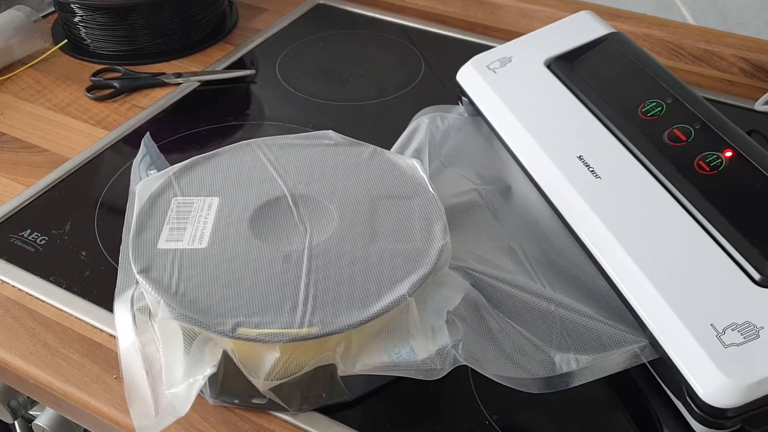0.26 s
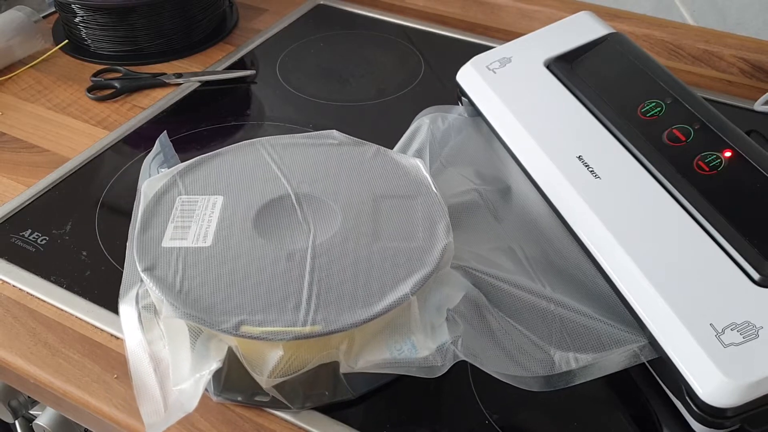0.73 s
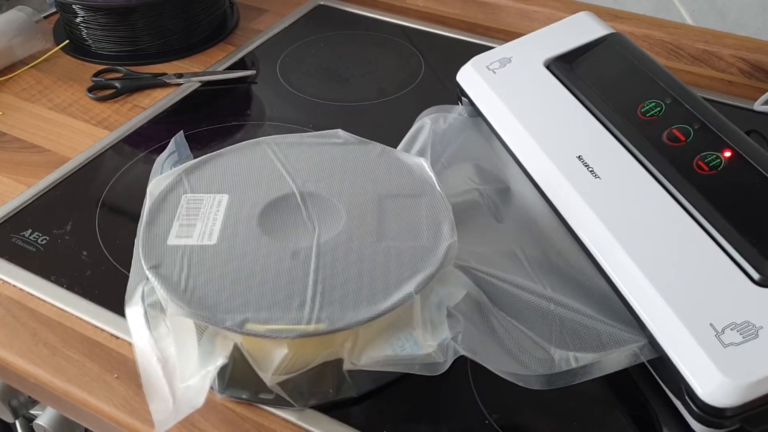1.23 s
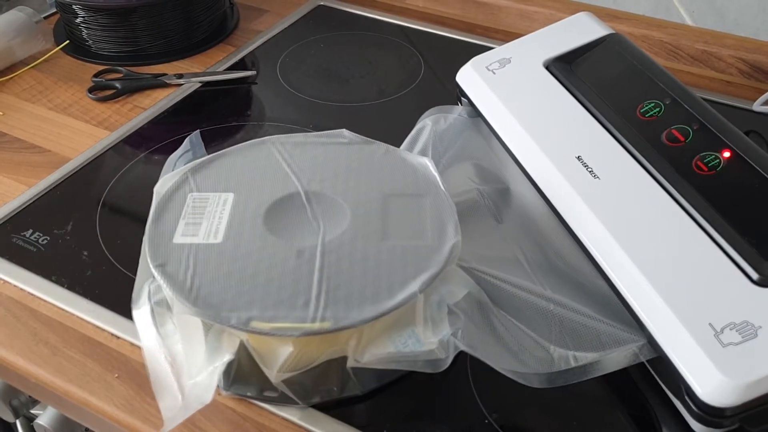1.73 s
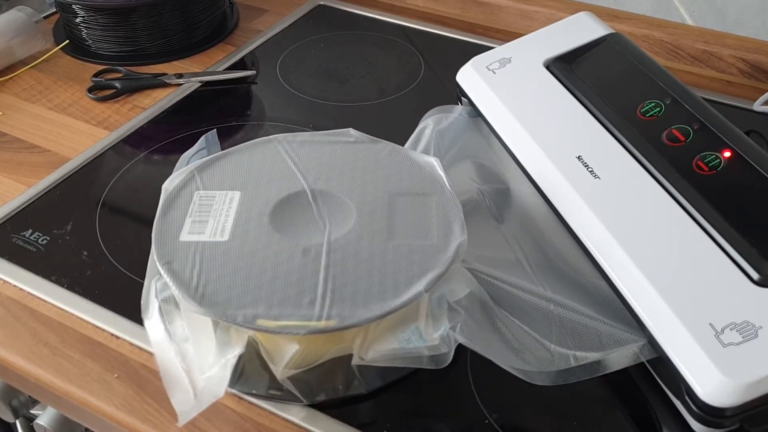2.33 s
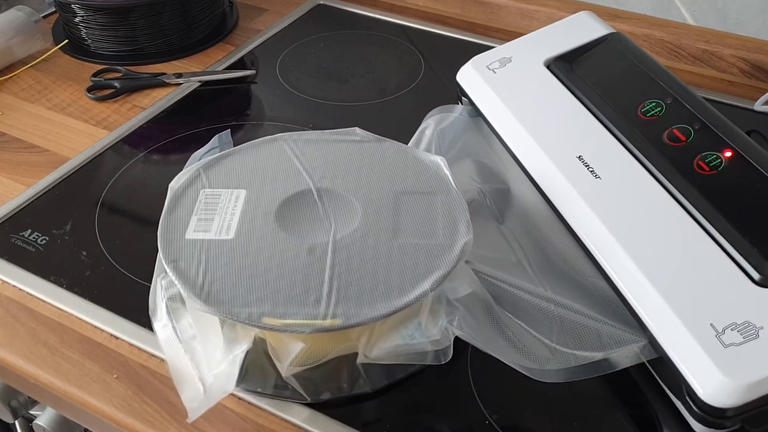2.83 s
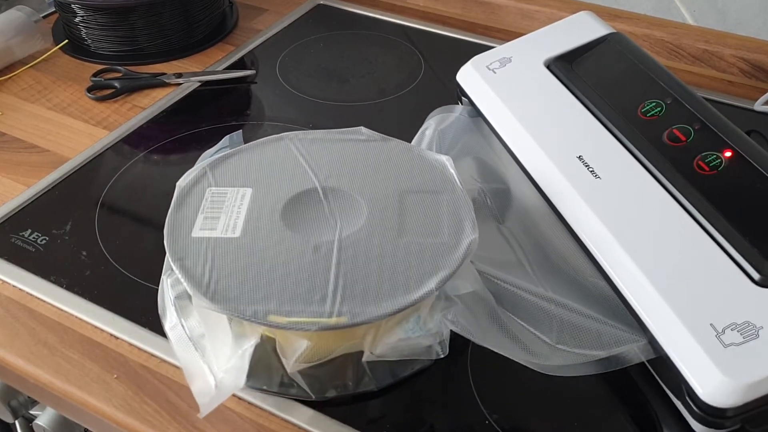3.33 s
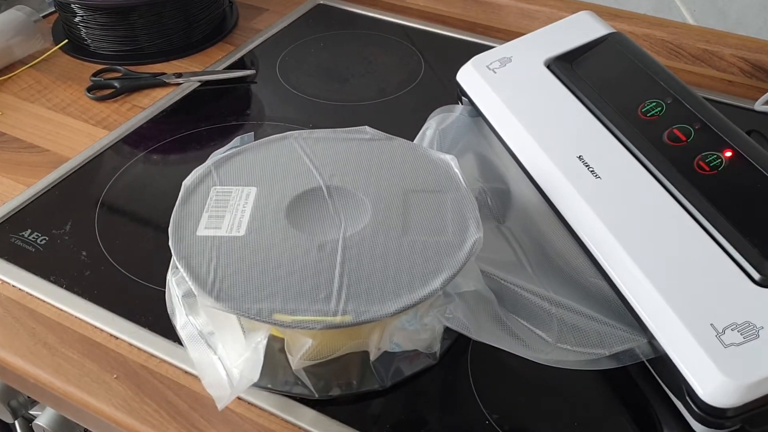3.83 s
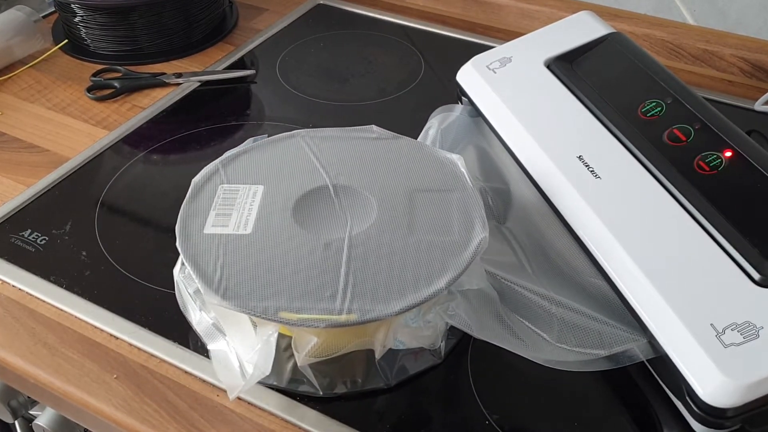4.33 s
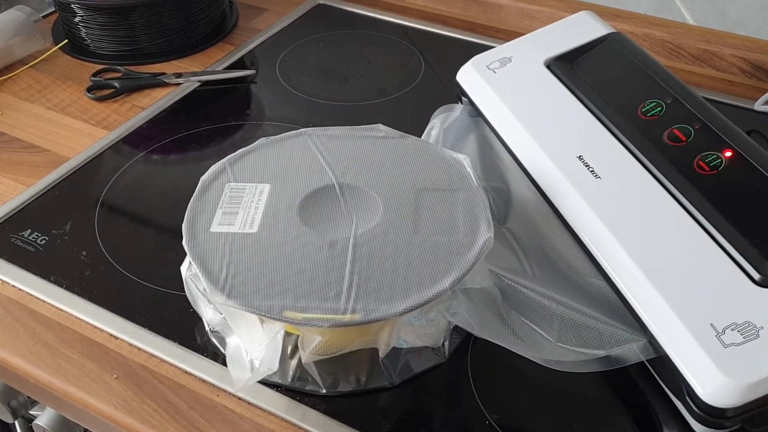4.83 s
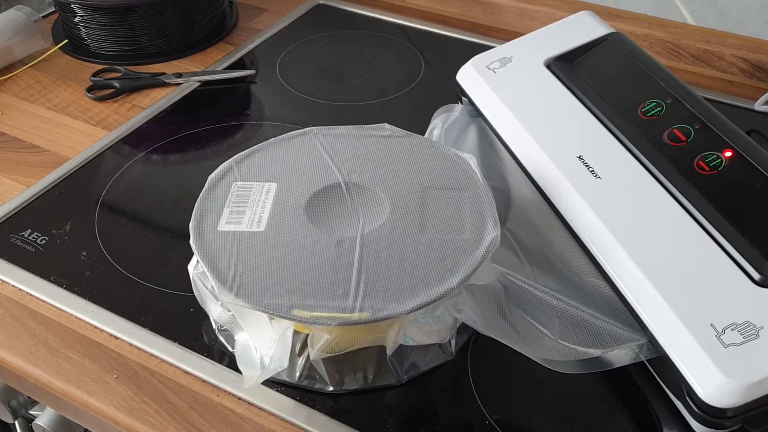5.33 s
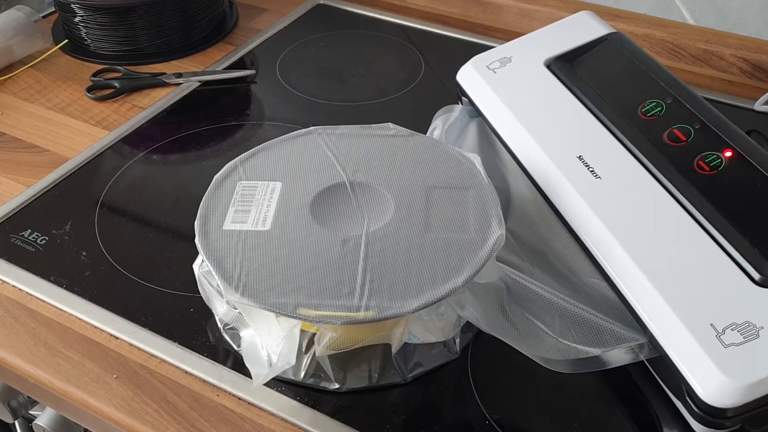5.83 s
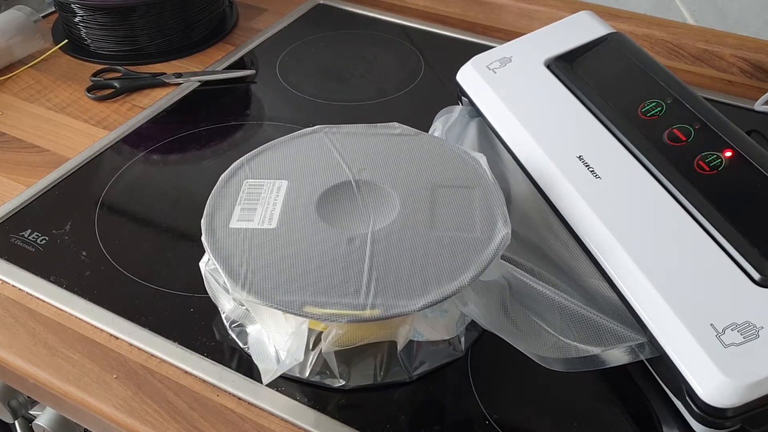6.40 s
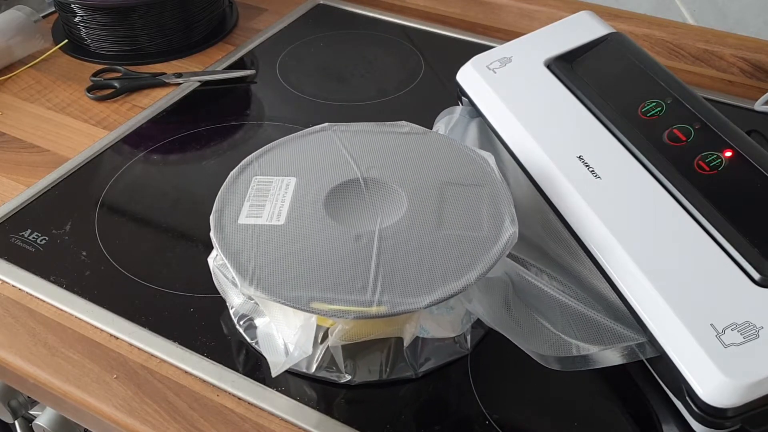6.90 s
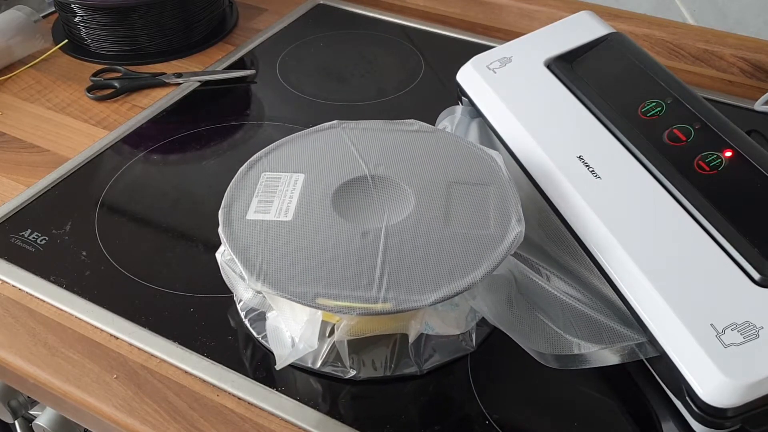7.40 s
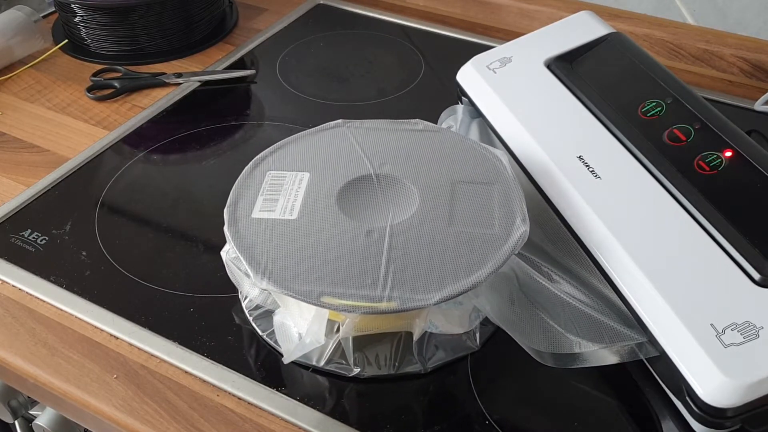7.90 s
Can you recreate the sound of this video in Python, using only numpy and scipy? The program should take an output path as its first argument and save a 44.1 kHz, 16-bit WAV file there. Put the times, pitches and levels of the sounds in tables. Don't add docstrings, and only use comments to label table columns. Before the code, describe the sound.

Steady low electric pump drone in a kitchen, buzzy and hissing, sinking very slightly in pitch as a plastic bag tightens with sharp little pops.

```python
import sys
import numpy as np
from scipy import signal
from scipy.fft import rfft, irfft, next_fast_len
from scipy.io import wavfile

SR = 44100
rng = np.random.default_rng(int(sys.argv[2]) if len(sys.argv) > 2 else 0)


def put_to_file(sound):
    columns = np.atleast_2d(sound).T
    safe = np.clip(columns, -1, 1)
    whole_steps = np.round(safe * 32767)
    wavfile.write(sys.argv[1], SR, whole_steps.astype(np.int16))


def elevation(decibels):
    levels = np.asarray(decibels, float)
    return 10 ** (levels / 20)


N = 359415
BLOCK = 100
PER_HZ_DB = 10 * np.log10(SR / 2)


def unit(x):
    return x / np.sqrt(np.mean(x ** 2, axis=-1, keepdims=True) + 1e-20)


def at_hz(points, hz):
    table = np.array(points)
    return np.interp(np.log(hz + 1), np.log(table[:, 0]), table[:, 1])


# (frequency [Hz], left over right [dB])
EAR_BALANCE = [(200, -3), (1500, 1.5), (3200, 4), (5500, 1.7), (7500, -3.5), (10000, -3), (12000, -5.5),
               (14700, -9)]


def coloured(x, spectrum, offset_db):
    size = next_fast_len(N)
    hz = np.arange(size // 2 + 1) * SR / size
    ears_db = at_hz(spectrum, hz) + at_hz(EAR_BALANCE, hz) * np.array([[.5], [-.5]])
    return irfft(rfft(x, size) * elevation(ears_db + offset_db), size)[:, :N]


def drift(rate, count):
    r = np.exp(-2 * np.pi * rate * BLOCK / SR)
    white = rng.standard_normal((count, N // BLOCK + 2002))
    return unit(signal.lfilter([1], [1, -2 * r, r * r], white)[:, 2000:])


def full_rate(slow):
    return np.interp(np.arange(N) / BLOCK, np.arange(len(slow)), slow)


def resonance(x, hz, width_hz):
    r = np.exp(-np.pi * width_hz / SR)
    poles = [1, -2 * r * np.cos(2 * np.pi * hz / SR), r * r]
    return signal.lfilter(np.array([1, 0, -1]) * (1 - r * r) / 2, poles, x)


def ears_noise(length, alike_hz):
    mid, side = rng.standard_normal((2, length))
    side = signal.sosfilt(signal.butter(1, alike_hz, "high", fs=SR, output="sos"), side)
    return (mid + side * [[1], [-1]]) / np.sqrt(2)


# (time [s], speed [turns per s])
SHAFT_SPEED = [(0, 71.46), (1.4, 71.19), (4.0, 70.81), (5.2, 70.56), (5.6, 70.41), (6.8, 70.1),
               (8.15, 69.84)]


def shaft_speed(s):
    return np.interp(s, *np.transpose(SHAFT_SPEED))


def hum_angle(k, start, vacuum, tight):
    if k < 4:
        return -.7 * (k == 1)
    if k < 10:
        bend = tight
        if k == 4:
            bend = vacuum ** .7
        elif k < 9:
            bend = vacuum ** 3
        slack = -1.4 + (k in (6, 7, 9)) * (-1) ** k
        loaded = .7 + .5 * (k - 6.4) ** 2
        return (1 - bend) * slack - bend * loaded
    if k < 20:
        return 2 - .9 * (k - 9) - .35 * (k - 9) ** 2 + (1 - vacuum) * start
    burst = -2 * np.pi * (k - 24) * (.27 - .15 * vacuum) - 1 + 2.8 * vacuum
    return burst + (.08 + 1.5 * vacuum ** 4 + (k > 27)) * start


# (multiple, level [dB rms], change [dB], left over right [dB], change [dB])
STRONG_HUM = [ (1, -42, 3.5, 1, 0), (2, -28, -1, 0, 0), (3, -31, -3.5, 2, 0), (4, -57, 17, 5, 0),
              (5, -46, 1.5, 9, 0), (6, -49, 2, -8, -2), (7, -46, -.5, -1, -1), (8, -45.5, -2.5, -12, 8),
              (9, -54, 12, 0, -12), (10, -62, 11, -16, 15), (11, -49.5, -7, 4, -17), (12, -52, 2, 7, -12),
              (14, -52, 4, -4, 6), (16, -47.5, 0, 13, -8), (21, -60, 3, 0, -2), (22, -55, -10, -12, 12),
              (23, -47, -7, 5, -2), (24, -42, -6.5, 8, 7), (25, -52.5, -1, -5, 3), (26, -48, -10, -8, 6),
              (27, -56, 3, -2, 0), (48, -48, 0, 3, 0), (49, -55, 0, 3, 0), (81, -56, -2, 0, 0)]
PANEL_RESONANCES = {16: (1130, 8), 48: (3443, 14), 49: (3443, 14)}


def hum(turns):
    turns = np.pad(turns, (0, BLOCK - N % BLOCK), "edge").reshape(-1, BLOCK)
    out = np.zeros((2, *turns.shape))
    spin, step = 1, np.exp(2j * np.pi * turns).astype(np.complex64)
    within = np.arange(BLOCK, dtype=np.float32) / BLOCK
    flutter = drift(6.1, count=6)
    vacuum = np.linspace(0, 1, flutter.shape[1])
    s = vacuum * N / SR
    tight = .5 + .5 * np.tanh((s - 5.15) / 0.24 / 2)
    speed = shaft_speed(s)
    strong = {row[0]: row[1:] for row in STRONG_HUM}
    for k in [*range(1, 38), 48, 49, 81]:
        spin = spin * step if k < 38 else np.exp(2j * np.pi * k * turns).astype(np.complex64)
        start = rng.uniform(-np.pi, np.pi)
        angle = hum_angle(k, start, vacuum, tight)
        if k in strong:
            load = vacuum if 1 < k < 7 else tight
            level_db, change_db, pan_db, pan_change_db = strong[k]
            level_db = level_db + change_db * load
            pan_db = pan_db + pan_change_db * load
        else:
            node = 5 * start + 9 * vacuum
            level_db = -63 + 5 * np.cos(node)
            pan_db = 23 * np.sin(node + start)
            if k > 27:
                level_db = level_db + 6 * (vacuum - .5) - 0.35 * (k - 27)
        if k in PANEL_RESONANCES:
            panel_hz, width_hz = PANEL_RESONANCES[k]
            level_db = level_db - 10 * np.log10(1 + ((k * speed - panel_hz) / width_hz) ** 4)
        if k < 8:
            lead = -0.022
        else:
            lead = np.sign(start) * (1 if k in strong and not 24 < k < 28 else 2.1)
        left = elevation(pan_db / 2) * np.exp(.5j * lead)
        right = elevation(-pan_db / 2) * np.exp(-.5j * lead)
        shake_db = (0.018 + 0.0079 * k) * flutter[1 + k % 5]
        wobble = 0.008 * k * flutter[0]
        middle = np.sqrt(2) * elevation(level_db + shake_db) * np.exp(1j * (angle + wobble))
        for ear, gain in enumerate((left, right)):
            slow = (middle * 2 * gain / (left + right)).astype(np.complex64)[:, None]
            out[ear] += (spin * (slow[:-1] + np.diff(slow, axis=0) * within)).real
    return out.reshape(2, -1)[:, :N]


# (share of the turn, level [dB])
TURN_CONTACTS = [(.05, -5), (.27, -7), (.49, -3), (.62, -8), (.84, -5), (.95, 2)]
# (frequency [Hz], level [dB per Hz], change at full vacuum [dB])
RATTLE_COLOUR = [(2330, -120, 4), (2350, -97, -14), (2580, -90, 5), (2880, -75.5, -2), (3550, -73.5, -6.5),
                 (4280, -78, -6.5), (4130, -79.5, -1.5), (5140, -81.5, 0), (6120, -75.5, -7),
                 (6300, -89, 2), (7500, -85, -5.5), (8500, -94, -27), (10440, -87, -1), (13900, -106, -21)]


def rattle(turns, vacuum, jitter_s, spread_db, ring_t60, ring_db):
    shares, contact_db = np.transpose(TURN_CONTACTS)
    marks = np.arange(int(turns[-1]) - 1)[:, None] + shares
    jitter = jitter_s * SR * rng.standard_normal(marks.shape)
    at = np.interp(marks, turns, np.arange(N)) + jitter + 16
    sizes = elevation(contact_db + spread_db * rng.standard_normal(marks.shape))
    taps = np.floor(at)[..., None] + np.arange(-7, 9)
    offset = taps - at[..., None]
    shapes = np.sinc(offset) * np.cos(np.pi * offset / 16) ** 2
    clicks = np.zeros(N + 64)
    np.add.at(clicks, taps.astype(int), sizes[..., None] * shapes)
    age = np.arange(SR // 4) / SR
    smear = elevation(ring_db - 60 * age / ring_t60) * rng.standard_normal((2, len(age)))
    smear[:, 0] += 3
    smear[1] = np.roll(smear[1], 8)
    smeared = unit(signal.fftconvolve(clicks[None, :N], smear, axes=1)[:, :N])
    loaded = [(hz, level_db + change_db) for hz, level_db, change_db in RATTLE_COLOUR]
    free_sound = coloured(smeared, RATTLE_COLOUR, PER_HZ_DB)
    loaded_sound = coloured(smeared, loaded, PER_HZ_DB)
    return (1 - vacuum) * free_sound + vacuum * loaded_sound


# (frequency [Hz], decay by 60 dB [s])
SNAP_ECHO = [(300, 0.12), (900, 0.093), (2500, 0.2), (6000, 0.28), (12000, 0.23)]


def echo_tails(age, count):
    white = ears_noise(count * len(age), 400).reshape(2, count, -1)
    between = [np.sqrt(a[0] * b[0]) for a, b in zip(SNAP_ECHO, SNAP_ECHO[1:])]
    edges = [150] + between + [16000]
    tails = 0
    for (hz, t60), low, high in zip(SNAP_ECHO, edges, edges[1:]):
        band = signal.sosfilt(signal.butter(2, [low, high], "band", fs=SR, output="sos"), white)
        tails = tails + band * elevation(-60 * age / t60) * np.clip(age / 0.0016, 0, 1)
    return tails


# (time [s], peak [dB], ring [Hz], crack over ring [dB], left over right [dB])
FILM_SNAPS = [(0.2913, -25, 5300, 10, -3), (1.011, -18, 4540, 3, 1), (1.6677, -14, 860, -21, 6),
              (2.63, -25, 3000, -10, 1), (3.409, -10.5, 344, -12, 1), (3.412, -14, 1010, -9, 5),
              (3.905, -8, 2140, 0, 9.5), (3.913, -5, 2920, -16, 6), (3.928, -8, 2630, -25, 4),
              (4.2397, -13, 3020, -18, -1), (4.345, -5, 1480, -6, 10), (5.1382, -16, 1290, -3, -4.5),
              (5.6322, -7, 1870, 4.5, 5.5), (6.114, -28, 3530, 12, 4), (6.451, -14, 1335, -8, 7),
              (7.034, -22, 3830, 8, 8), (7.1933, -14.5, 5170, 7, 0), (7.3912, -4.5, 1620, -15, 14),
              (7.498, -10, 1070, -14, 4), (7.5058, -3, 1860, -7, 15), (7.647, -16, 2330, 10, 0.5),
              (7.7939, -15.5, 3620, 3, 2), (7.893, -12, 1580, -3.5, 11), (7.9565, -24, 1300, -16, 2)]
# (frequency [Hz], level [dB])
MICROPHONE_COLOUR = [(200, -21.5), (700, -9), (2000, -4.5), (7500, -3), (8600, -10.5), (10000, -9),
                     (15500, -14)]


def snaps(echo_db):
    out = np.zeros((2, N + SR))
    age = np.arange(SR // 4) / SR
    tails = echo_tails(age, len(FILM_SNAPS))
    age = age[:400]
    for i, (s, peak_db, hz, crack_db, pan_db) in enumerate(FILM_SNAPS):
        ring = np.sin(2 * np.pi * hz * age) * elevation(-60 * age * hz / (5 + hz / 1200))
        crack = ears_noise(400, alike_hz=3000) * elevation(crack_db - 10.0 - 60 * age / 0.056)
        front = elevation(crack_db / 2 + 4.5) * np.exp(-age * (6000 + 2.0 * hz))
        ears = elevation(peak_db) * elevation([[0], [-pan_db]])
        direct = ears * (ring + crack + front)
        crack_click = (age == 0) * np.sqrt(np.sum(crack.mean(0) ** 2))
        sent = ring + front + crack_click
        wet = elevation(echo_db) * ears.mean() * signal.fftconvolve(sent[None], tails[:, i], axes=1)
        at = round(s * SR)
        out[:, at:at + 400] += direct
        out[:, at:at + wet.shape[1]] += wet
    return coloured(out[:, :N], MICROPHONE_COLOUR, 0)


def valve_tick(turns, vacuum, ring_hz, level_db):
    gate = np.exp(11.0 * (np.cos(2 * np.pi * (turns - .6)) - 1))
    ring = np.sin(2 * np.pi * ring_hz * (turns % 1) / SHAFT_SPEED[-1][1])
    rise_db = np.interp(vacuum, [.7, .92, .96], [-26, -12, 0])
    uneven_db = 3.1 * full_rate(drift(24, count=1)[0])
    ear_gains = elevation(0) * np.array([[1.0], [1.0]]) * elevation([[1.0], [-1.0]])
    return elevation(level_db + rise_db + uneven_db) * gate * ring * ear_gains


# (frequency [Hz], level [dB per Hz])
HISS_COLOUR = [(40, -80.5), (170, -72.5), (330, -81), (1300, -84), (2400, -78), (2650, -92), (2850, -83.5),
               (4700, -87), (7300, -87), (8300, -93), (9000, -95), (9600, -90), (11800, -91),
               (15500, -88.5)]
# (frequency [Hz], width [Hz], level [dB rms], change at full vacuum [dB])
HOUSING_BANDS = [(1724, 200, -50, -8), (4440, 230, -54.5, -0.5), (4860, 120, -56.5, -6.5),
                 (3460, 120, -76, -17), (5900, 320, -68, -14), (7640, 220, -58, -4.5),
                 (1253, 210, -62, 10.5)]


def hiss(turns, vacuum, pulse_db, patchy_db):
    stroke = np.cos(2 * np.pi * turns - 1.6)
    stroke += 0.16 * np.cos(4 * np.pi * turns + 4.9) + .5 * np.cos(6 * np.pi * turns + 1.8)
    air = ears_noise(N, alike_hz=270)
    bright = signal.sosfilt(signal.butter(2, 1200, "high", fs=SR, output="sos"), air)
    puffs = bright * (elevation(pulse_db * stroke) - 1)
    out = coloured(air + puffs, HISS_COLOUR, PER_HZ_DB)
    white = rng.standard_normal((2, N))
    flares = drift(6.6, count=len(HOUSING_BANDS))
    for (hz, width_hz, level_db, change_db), flare in zip(HOUSING_BANDS, flares):
        band = resonance(resonance(white, hz, width_hz), hz, 0.94 * width_hz)
        flare_db = patchy_db * full_rate(flare) + 1.7 * pulse_db * stroke
        out += elevation(level_db + change_db * vacuum + flare_db) * unit(band)
    return out


def scene():
    turns = np.cumsum(shaft_speed(np.arange(N) / SR)) / SR
    vacuum = np.arange(N) / N
    mix = hum(turns)
    mix += rattle(turns, vacuum, jitter_s=6e-6, spread_db=.9, ring_t60=.06, ring_db=-17)
    mix += snaps(echo_db=-22.5)
    mix += valve_tick(turns, vacuum, ring_hz=2524, level_db=-39)
    mix += hiss(turns, vacuum, pulse_db=-2.0, patchy_db=1.5)
    return mix


def band_limit(x):
    return signal.sosfilt(signal.butter(12, 16820, fs=SR, output="sos"), x)


def record(dry):
    low_pass = signal.cheby2(10, 40, 16100, fs=SR, output="sos")
    mix = signal.sosfilt(low_pass, dry)
    return band_limit(mix)


dry = scene()
out = record(dry)
put_to_file(out)
```